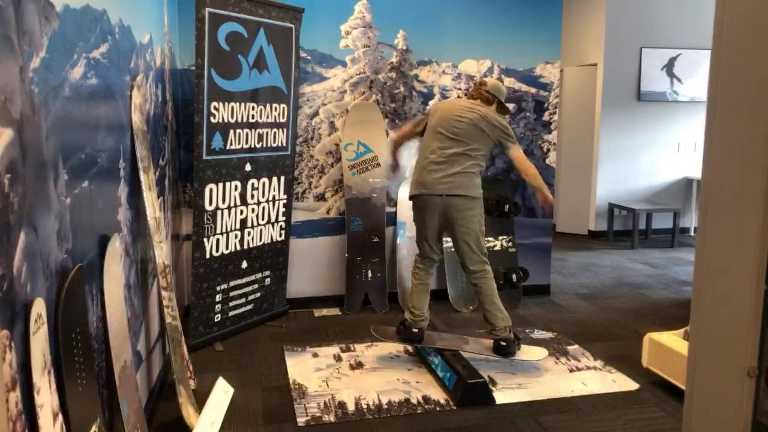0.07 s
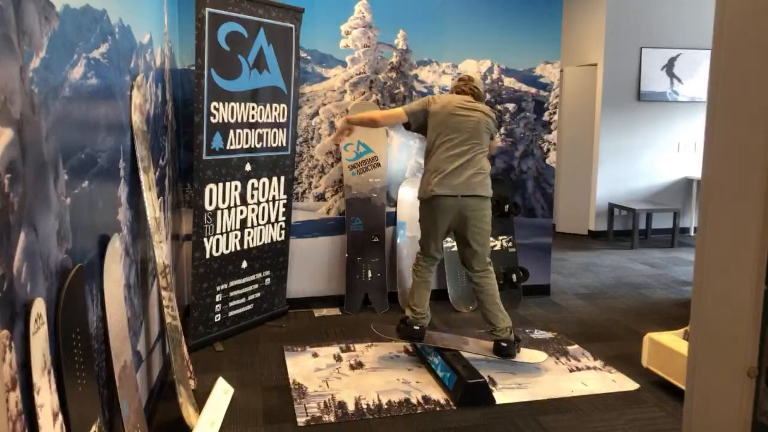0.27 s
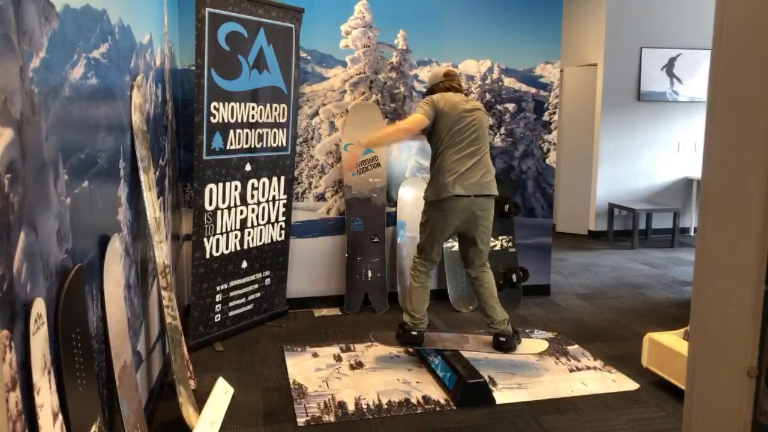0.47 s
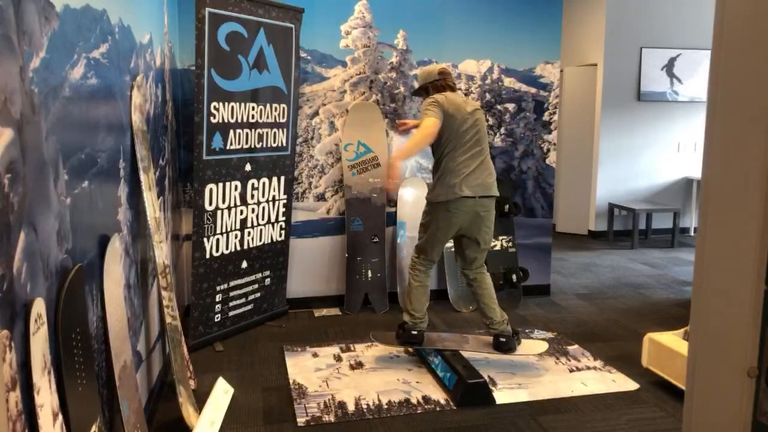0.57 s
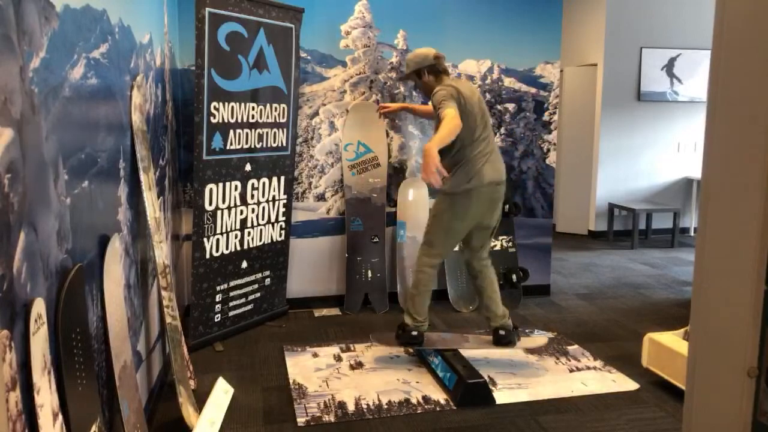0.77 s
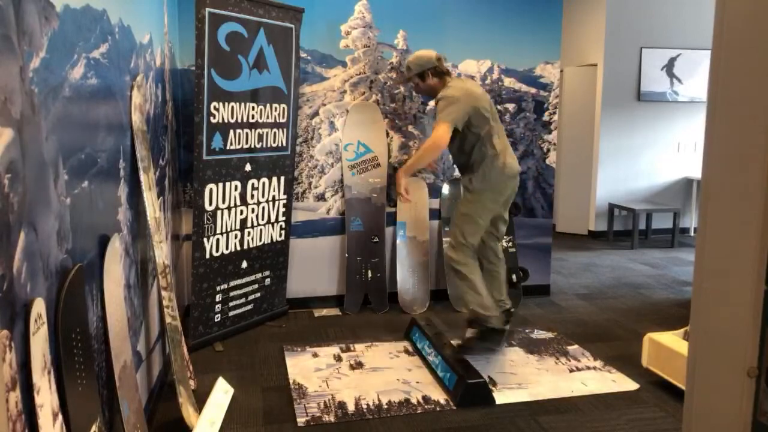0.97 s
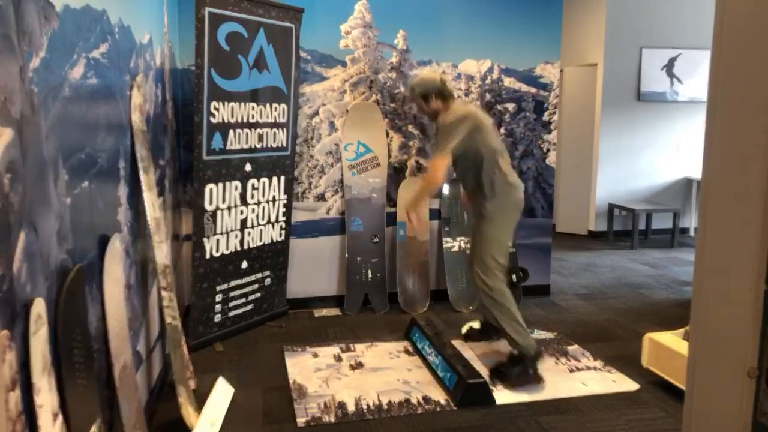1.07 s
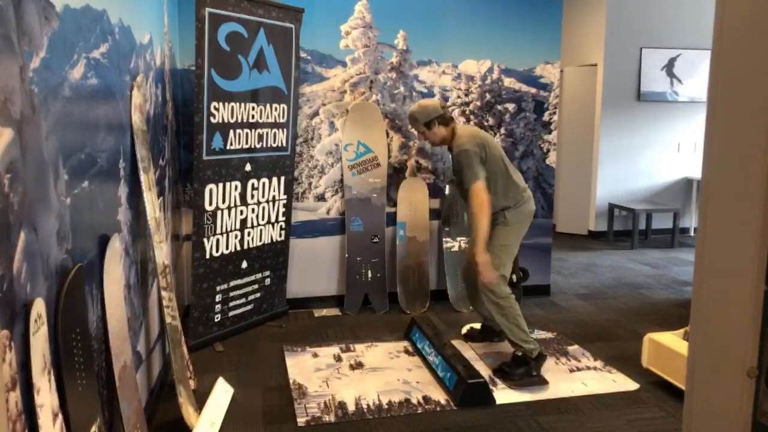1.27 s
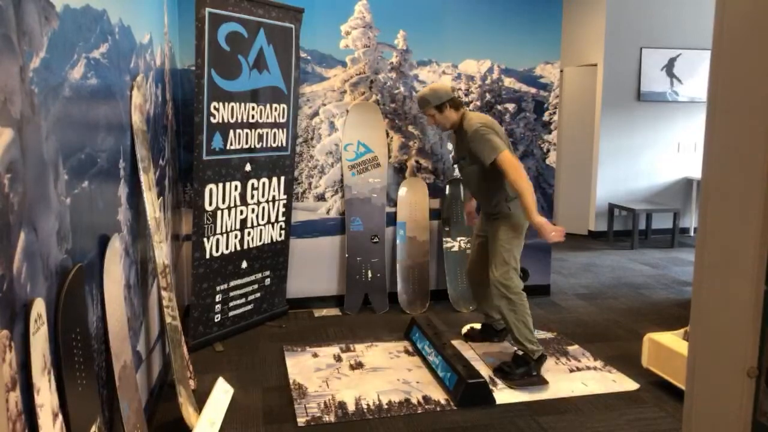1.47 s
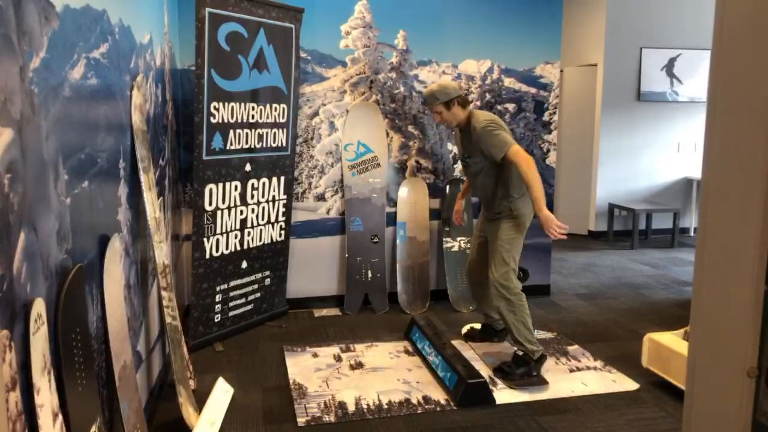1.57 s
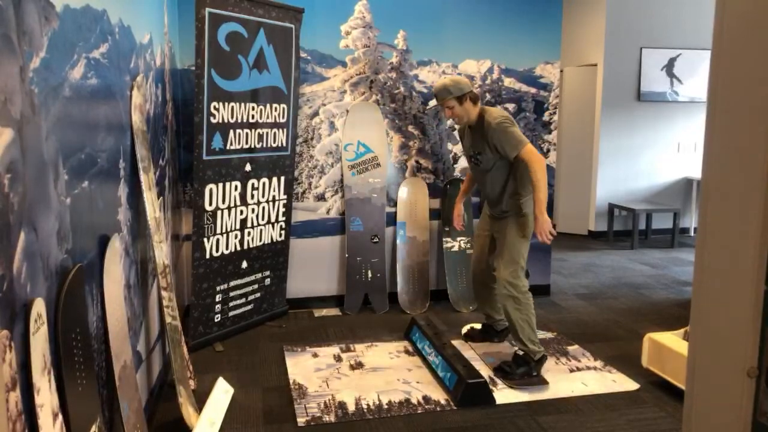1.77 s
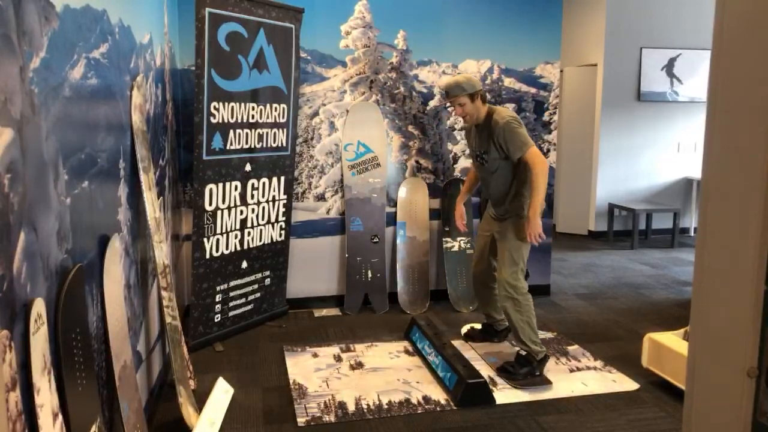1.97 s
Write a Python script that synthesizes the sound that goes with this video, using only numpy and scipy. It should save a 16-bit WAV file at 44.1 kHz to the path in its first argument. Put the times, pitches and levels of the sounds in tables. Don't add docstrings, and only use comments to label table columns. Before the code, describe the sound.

A snowboard hops off a low box and slams onto a mat: quiet scuffs and creaks first, a light tail touch, then a loud hollow thud with sharp rattle, brief room ring and soft settling scuffs, at a moderate distance.

```python
import sys
import numpy as np
from scipy import signal
from scipy.fft import rfft, irfft, next_fast_len
from scipy.io import wavfile
from scipy.ndimage import uniform_filter1d

SR = 44100
rng = np.random.default_rng(int(sys.argv[2]) if len(sys.argv) > 2 else 0)


def to_wav(sig):
    pcm = np.clip(np.atleast_2d(sig), -1, 1) * 32767
    pcm = np.round(pcm).astype(np.int16)
    wavfile.write(sys.argv[1], SR, pcm.T)


def makeup_ratio(level_db):
    decades = np.asarray(level_db, float) / 20
    return 10 ** decades


N = 89170
LEAD = SR // 2

# frequency in Hz, level in dB per Hz.
AIR_COLOUR = [(24, -44), (40, -39), (174, -24), (247, -10), (302, -4), (360, -11), (671, -15.5),
              (1160, -24), (15600, -53)]
# frequency in Hz, width in Hz, level in dB.
VENT_TONES = [(79.7, 41, -68), (124.1, 6.5, -64.5), (153.8, 5.2, -63), (198.4, 19, -62), (262, 30, -66),
              (359.8, 8.2, -64), (1496, 400, -72)]
# frequency in Hz, level in dB.
MAINS_TONES = [(120, -65)]
# centre in seconds, half width in seconds, depth in dB.
DUCT_SAGS = [(0.031, 0.038, 16), (.165, 0.011, 8), (.315, 0.022, 14), (.47, 0.02, 15), (.7, 0.028, 12),
             (.79, .01, 13), (.87, 0.031, 4), (1.62, 0.034, 5), (1.72, 0.01, 0), (1.78, 0.0095, 2),
             (1.88, 0.016, 14), (1.945, 0.025, 13)]

# frequency in Hz, time to die by 60 dB in seconds.
ROOM_DECAY = [(60, 1.15), (240, 0.4), (450, 1.026), (1000, 1.175), (2300, 0.8), (3250, 0.94), (4300, 0.89),
              (5200, 0.69), (7500, 0.49), (12000, 0.34)]
# frequency in Hz, level in dB per Hz.
ROOM_COLOURS = [
    [(40, -49), (190, 9), (300, -8.5), (600, -5), (1000, -8), (2000, -17), (3500, -24.5), (15500, -31)],
    [(100, -19), (180, 6.5), (300, 7), (800, -9.5), (1500, -13.5), (3000, -24), (6000, -33.5), (15500, -76)],
    [(135, -18.5), (200, 1), (700, -11.5), (1900, -22.5), (3200, -22), (5100, -34), (7000, -31.5),
     (15500, -46.5)],
]

# start in seconds, rise in seconds, time to die by 60 dB in seconds, level in dB.
SCUFFS = [(.11, 0.024, 0.9, -54), (0.191, 0.031, 0.49, -67), (1.31, 0.021, 0.88, -56),
          (1.42, .03, 0.23, -58), (.426, 0.002, 0.13, -61), (0.482, 0.0082, 0.097, -44.5),
          (.497, 0.0082, 0.47, -51.5), (0.535, 0.0037, 0.61, -54.5), (.58, 0.0059, 0.5, -56.5),
          (.64, 0.05, 1, -56), (0.712, 0.035, 0.86, -55), (0.771, 0.039, 0.76, -46.5),
          (0.878, 0.078, 1, -46.5), (1.743, 0.0097, 0.57, -58.5), (1.773, .02, 0.39, -53.5),
          (1.81, .02, 0.88, -57), (1.96, 0.026, 1, -65)]
# frequency in Hz, level in dB per Hz.
SCUFF_COLOUR = [(200, -58), (400, -2), (900, -3.5), (1800, -9.5), (3300, -11), (6500, -22), (9000, -30.5),
                (15500, -36.5)]
# time in seconds, level in dB.
GRIT_TICKS = [(.43, -70), (0.483, -55), (.5, -53), (0.54, -57), (0.584, -59), (0.763, -56.5), (.956, -55),
              (0.967, -64), (1.744, -67), (1.785, -58), (1.82, -60)]
# frequency in Hz, level in dB per Hz.
TICK_COLOUR = [(1200, -30), (2500, -4), (5000, 5), (8000, -7.5), (11000, -27), (15500, -37)]
# frequency in Hz, level in dB per Hz.
DRAG_COLOUR = [(800, -7), (2100, -4), (5000, 0), (9000, -14), (13000, -15), (15700, -22)]

# start in seconds, level in dB, frequency in Hz, time to die by 60 dB in seconds.
PLANK_RINGS = [(.03, -40, 376.5, 0.18), (.957, -30, 790, 0.057), (.962, -36, 300, 0.089),
               (.988, -42, 1090, .05), (.996, -31, 833, 0.072), (1.037, -29, 995, 0.055),
               (1.042, -17.5, 441, 0.17), (1.044, -27.5, 1240, 0.067), (1.05, -25, 755, 0.035),
               (1.056, -24, 1338, 0.037), (1.064, -15, 400, 0.061), (1.066, -27, 903, 0.11),
               (1.077, -14, 542, 0.082), (1.084, -33, 770, 0.056), (1.094, -25, 1130, .05),
               (1.103, -29, 512, .07), (1.112, -26, 866, 0.059), (1.122, -17, 291, 0.096),
               (1.135, -22, 507, 0.057), (1.168, -35, 930, 0.066), (1.188, -28, 470, 0.086),
               (1.239, -44, 556, .07), (1.264, -40, 860, 0.055), (1.314, -46, 550, 0.061),
               (1.04, -17, 262, 0.067), (1.069, -22, 277, .08), (1.093, -27, 260, .08),
               (1.164, -31, 163, 0.14), (1.245, -34.5, 161, 0.16), (1.032, -22, 227, 0.028),
               (-.005, -40, 192, .2), (.07, -48, 535, .15), (.14, -50, 700, .15), (.16, -52, 950, .15),
               (1.142, -32, 700, .07), (1.06, -31, 1200, .07), (1.12, -33, 1000, .07),
               (1.805, -48, 240, .2)]
# frequency in Hz, level in dB, time to die by 60 dB in seconds.
EDGE_MODES = [(2392, -22.5, 0.037), (3190, -21, 0.033), (4590, -28.5, 0.034), (5800, -31, .02),
              (7240, -41, 0.12)]
# start in seconds, level in dB.
EDGE_SNAPS = [(1.0353, -29), (1.0388, -40), (1.0472, -27), (1.0525, -28), (1.0562, -28), (1.0608, -32),
              (1.067, -37), (1.0785, -29), (1.092, -41)]
# frequency in Hz, level in dB per Hz.
SNAP_COLOUR = [(2500, -29), (5000, -2), (8000, 0), (11000, -5), (15500, -13)]
# frequency in Hz, level in dB per Hz.
BITE_COLOUR = [(3000, -30), (6000, -9), (10000, -6), (14000, -7), (15800, -35)]

# peak time in seconds, level in dB.
RATTLES = [(1.0398, -19.5), (1.048, -33), (1.054, -22), (1.063, -24), (1.067, -30), (1.084, -28),
           (1.105, -29), (1.122, -41), (1.317, -53)]
# frequency in Hz, level in dB per Hz.
RATTLE_COLOUR = [(1500, -40), (2600, -16), (3200, 3), (3900, -5), (5200, -12), (7200, -14), (15500, -57)]
# frequency in Hz, level in dB, time to die by 60 dB in seconds.
BINDING_MODES = [(2490, -4, 0.025), (2968, 2, 0.038), (3203, -2, 0.029), (3650, -22, 0.021),
                 (4424, -5, 0.029), (6940, -25, 0.019)]

# start in seconds, level in dB, lowest mode in Hz, level of the upper modes in dB.
KNOCKS = [(0.421, -41, 240, -18), (0.546, -39, 240, -8), (0.798, -41, 213, -23), (0.814, -36, 221, -14.5),
          (.956, -33, 206, -12), (0.991, -36, 295, -20), (1.012, -41, 203, -15), (1.039, -12, 240, -16),
          (1.0437, -16, 226, -8.5), (1.0575, -10, 201, -18), (1.08, -15, 192.6, -7.5), (1.106, -24, 225, 2),
          (1.139, -16, 214, -15), (1.19, -27, 225, 1), (1.224, -27, 206, -2), (1.374, -33.5, 224, -28),
          (1.42, -39, 236, -2), (1.479, -43.5, 240, -5), (1.515, -40.5, 251, -7), (1.961, -39, 233, -10)]
# frequency in Hz, level in dB, time to die by 60 dB in seconds.
PLANK_MODES = [(440, 2, 0.047), (282, -5, 0.044), (514, -13, 0.083), (874, -11.5, 0.081)]
# start in seconds, level in dB.
FLOOR_BOOMS = [(0.962, -40), (1.08, -24.5), (1.165, -38), (1.299, -54), (1.468, -57)]

# start in seconds, floor thud in dB, base slap in dB, room answer in dB.
LANDINGS = [
    (-.2, -43, -30, -27),
    (.956, -32, -58, -30.5),
    (1.033, -17, -21.5, -20),
]
# frequency in Hz, level in dB, time to die by 60 dB in seconds.
FLOOR_MODES = [(178, -5, 0.32), (220.8, -11.5, 0.41), (239.3, -13, 0.99), (298, -7.5, 0.73),
               (390, -39, 0.19), (425, -17.5, 1.46), (487, -33, 0.1), (509, -17, 1.1), (568.4, -23, 0.85),
               (610, -69, 0.23), (768.6, -40, 0.53), (907, -46, 1.1), (851, -26, 0.23), (967, -19, 0.92)]
# frequency in Hz, level in dB per Hz.
SLAP_COLOUR = [(710, -79), (1200, -5), (3320, 12), (4020, -15), (4720, -10), (5260, -13), (5850, -20),
               (15500, -42)]
SLAP_LAG_S = 0.003


def unit(x):
    return x / np.sqrt(np.mean(x ** 2) + 1e-20)


def along(points, hz):
    f, value = np.transpose(points)
    return np.interp(np.log(hz + 1), np.log(f + 1), value)


def noise(gain, size):
    m = next_fast_len(size + 8192)
    spectrum = rfft(rng.standard_normal(m)) * gain(np.fft.rfftfreq(m, 1 / SR))
    return unit(irfft(spectrum, m)[:size])


def coloured(colour, size):
    return noise(lambda f: makeup_ratio(along(colour, f)), size)


def swell(t, rise, t60):
    t = np.maximum(t, 0)
    return (1 - np.exp(-t / rise)) * makeup_ratio(-60 * t / t60)


def ringing(modes, t, rise, spread_db):
    total = 0
    for hz, db, t60 in modes:
        level = makeup_ratio(db + spread_db * rng.normal())
        total = total + level * swell(t, rise, t60) * np.sin(2 * np.pi * hz * t)
    return total


def above(x, hz, order):
    return signal.sosfilt(signal.butter(order, hz, "high", fs=SR, output="sos"), x)


def below(x, hz, order):
    return signal.sosfilt(signal.cheby2(order, 40, hz, fs=SR, output="sos"), x)


def add(track, s, x):
    part = track[round(s * SR) + LEAD:][:len(x)]
    part += x[:len(part)]


def burst(colour, t60):
    t = np.arange(SR // 8) / SR
    return swell(t, 0.0036, t60) * coloured(colour, len(t))


def ventilation():
    t = np.arange(N) / SR
    total = makeup_ratio(-56.5) * coloured(AIR_COLOUR, N)
    for hz, width, db in VENT_TONES:
        total += makeup_ratio(db) * noise(lambda f: 1 / (1 + ((f - hz) / width * 2) ** 2), N)
    for hz, db in MAINS_TONES:
        total += makeup_ratio(db) * np.sin(2 * np.pi * hz * t)
    return total


def duct():
    t = np.arange(N) / SR
    sag_db = sum(db * np.exp(-((t - s) / width) ** 2) for s, width, db in DUCT_SAGS)
    return np.sqrt(2) * makeup_ratio(-53 - sag_db) * np.sin(2 * np.pi * 240 * t)


def scuffs():
    t = np.arange(N) / SR
    power = sum((makeup_ratio(db) * swell(t - s, rise, t60)) ** 2 for s, rise, t60, db in SCUFFS)
    roughness_db = 0.5 * unit(uniform_filter1d(rng.standard_normal(N), size=90))
    friction = unit(makeup_ratio(roughness_db) * coloured(SCUFF_COLOUR, N))
    return np.sqrt(power) * friction


def grit_ticks():
    track = np.zeros(N + LEAD)
    for s, db in GRIT_TICKS:
        add(track, s - SLAP_LAG_S, makeup_ratio(db) * burst(TICK_COLOUR, t60=0.044))
    return track[LEAD:]


def tail_drag():
    t = np.arange(N) / SR
    start_s, end_s = 0.954, 1.04
    return makeup_ratio(-55) * swell(t - start_s, 0.003, 7.7) * (t < end_s) * coloured(DRAG_COLOUR, N)


def plank_rings():
    track, t = np.zeros(N + LEAD), np.arange(SR // 4) / SR
    for s, db, hz, t60 in PLANK_RINGS:
        add(track, s, ringing([(hz, db, t60)], t, rise=0.0027, spread_db=0))
    return track[LEAD:]


def steel_edge():
    track, t = np.zeros(N + LEAD), np.arange(SR // 4) / SR
    add(track, 1.034, makeup_ratio(-34) * burst(BITE_COLOUR, t60=0.018))
    add(track, 1.0355, ringing(EDGE_MODES, t, rise=0.0023, spread_db=0))
    for s, db in EDGE_SNAPS:
        add(track, s, makeup_ratio(db) * swell(t, 0.0002, 0.0027) * coloured(SNAP_COLOUR, len(t)))
    return track[LEAD:]


def rattles():
    track, t = np.zeros(N + LEAD), np.arange(SR // 4) / SR
    for s, db in RATTLES:
        add(track, s - SLAP_LAG_S, makeup_ratio(db) * burst(RATTLE_COLOUR, t60=0.039))
        ring = ringing(BINDING_MODES, t, rise=0.0012, spread_db=4.4)
        add(track, s - SLAP_LAG_S, makeup_ratio(db - 5.5) * ring)
    return track[LEAD:]


def knocks():
    track, t = np.zeros(N + LEAD), np.arange(SR // 4) / SR
    for s, db, hz, upper_db in KNOCKS:
        lowest = ringing([(hz, 0, 0.11)], t, rise=0.0018, spread_db=0)
        upper = ringing(PLANK_MODES, t, rise=0.0013, spread_db=1.9)
        add(track, s, -makeup_ratio(db) * above(lowest + makeup_ratio(upper_db) * upper, 157, order=4))
    return track[LEAD:]


def floor_booms():
    track, t = np.zeros(N + LEAD), np.arange(SR * 3 // 2) / SR
    for s, db in FLOOR_BOOMS:
        add(track, s, ringing([(72.4, db, 0.193)], t, rise=0.0082, spread_db=0))
    return track[LEAD:]


def room_answer(colour, size):
    hz, t, z = signal.stft(coloured(colour, size), SR, nperseg=256)
    clumps = unit(uniform_filter1d(rng.standard_normal(z.shape), size=5, axis=0))
    clumps_db = 3 * clumps * np.exp(-t / 0.14)
    decay_db = -60 * t / along(ROOM_DECAY, hz)[:, None]
    tail = signal.istft(z * makeup_ratio(clumps_db + decay_db), SR, nperseg=256)[1][:size]
    rise_s = 0.0046
    return tail * (1 - np.exp(-np.arange(size) / SR / rise_s))


def landings():
    track, t = np.zeros(N + LEAD), np.arange(SR * 3 // 2) / SR
    for (s, thud_db, slap_db, room_db), colour in zip(LANDINGS, ROOM_COLOURS):
        add(track, s, makeup_ratio(thud_db) * ringing(FLOOR_MODES, t, rise=0.019, spread_db=0.5))
        add(track, s, makeup_ratio(room_db) * room_answer(colour, len(t)))
        add(track, s + SLAP_LAG_S, makeup_ratio(slap_db) * burst(SLAP_COLOUR, t60=0.027))
    return track[LEAD:]


def scene():
    background = ventilation() + duct()
    rubbing = scuffs() + grit_ticks() + tail_drag()
    board = plank_rings() + steel_edge() + rattles() + knocks()
    return (background + rubbing + board + floor_booms() + landings())[None]


def low_pass(x):
    return signal.sosfilt(signal.butter(12, 15730, fs=SR, output="sos"), x)


def record(dry):
    mix = below(dry, 15800, order=16)
    mix = above(mix, 58.6, order=6)
    return low_pass(mix)


dry = scene()
out = record(dry)
to_wav(out)
```